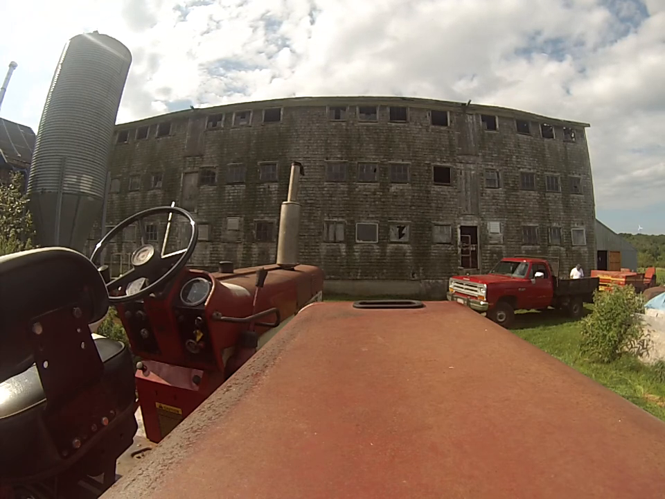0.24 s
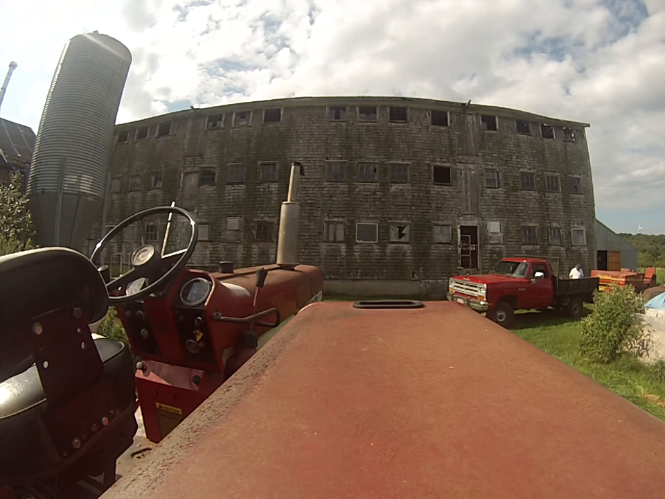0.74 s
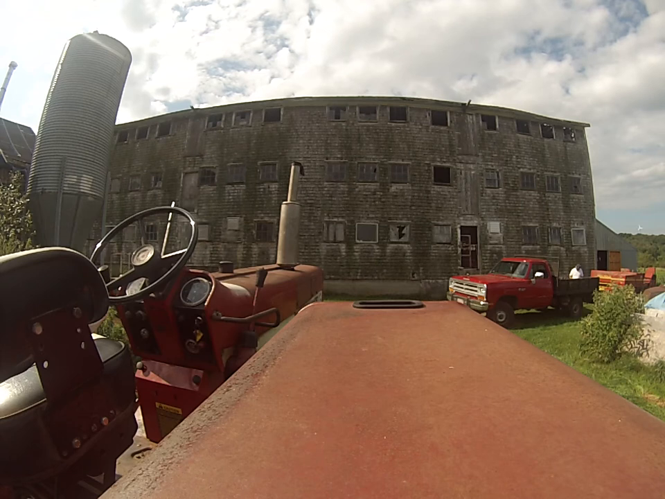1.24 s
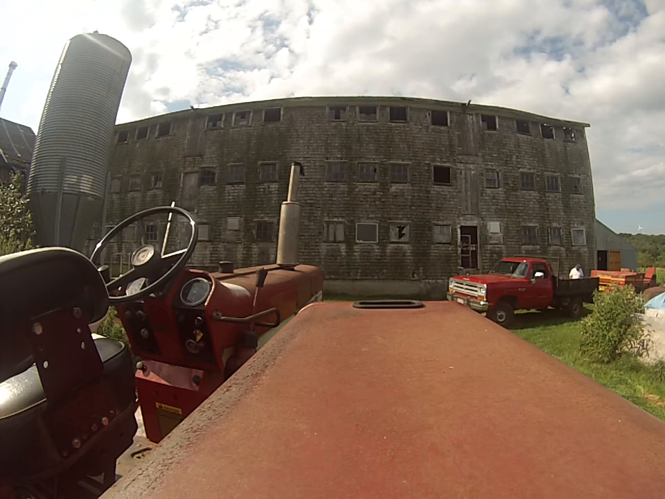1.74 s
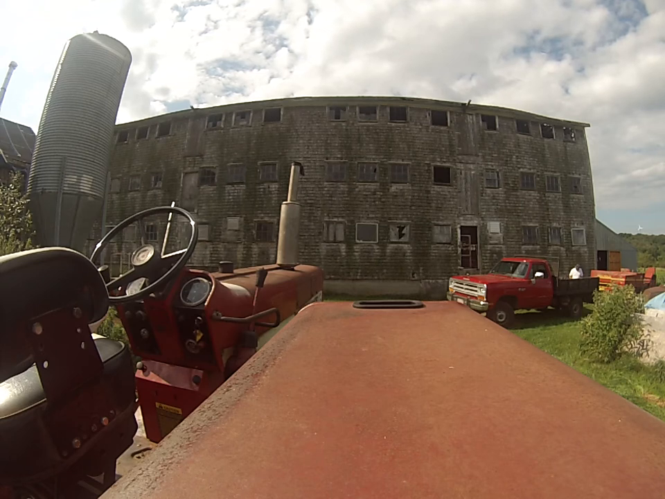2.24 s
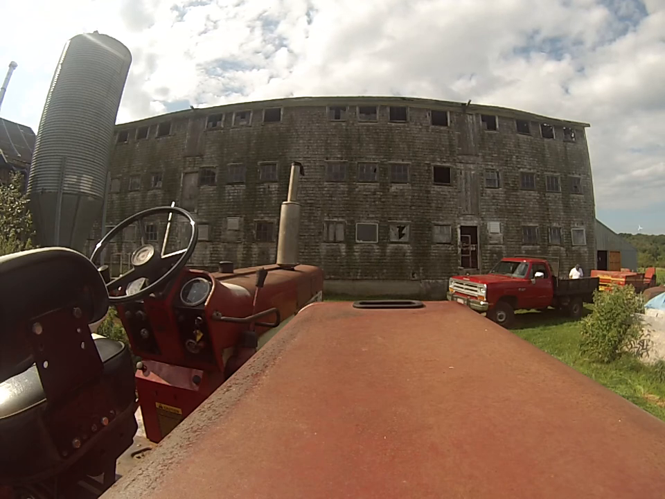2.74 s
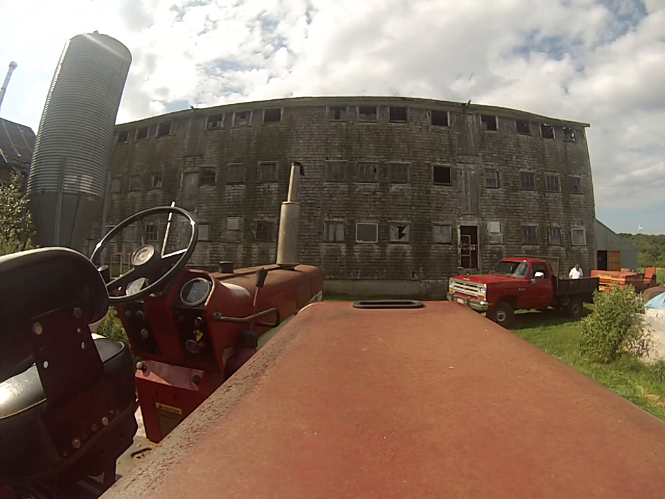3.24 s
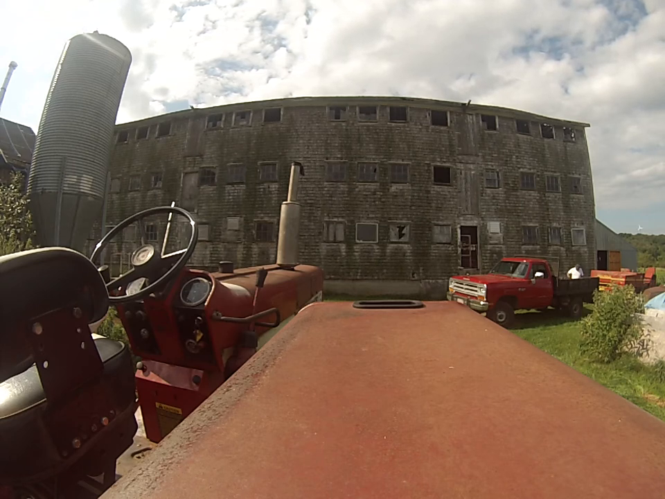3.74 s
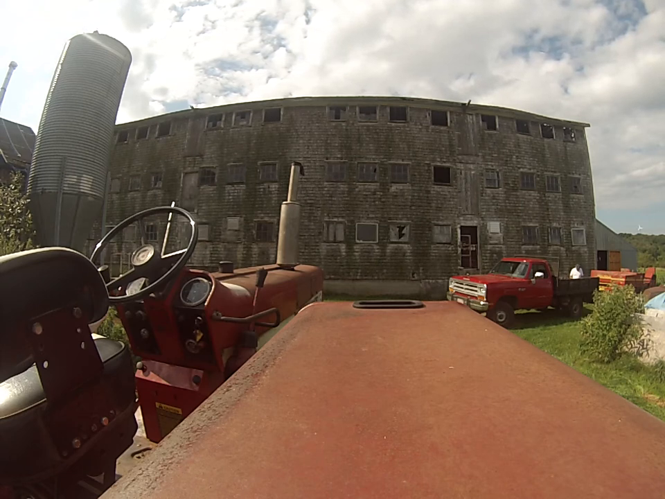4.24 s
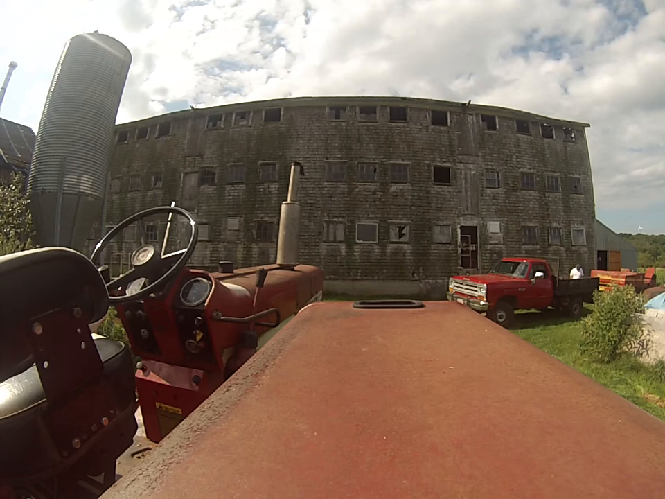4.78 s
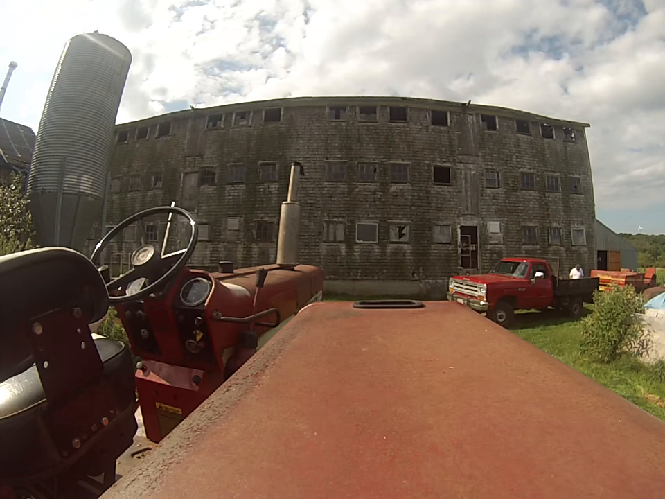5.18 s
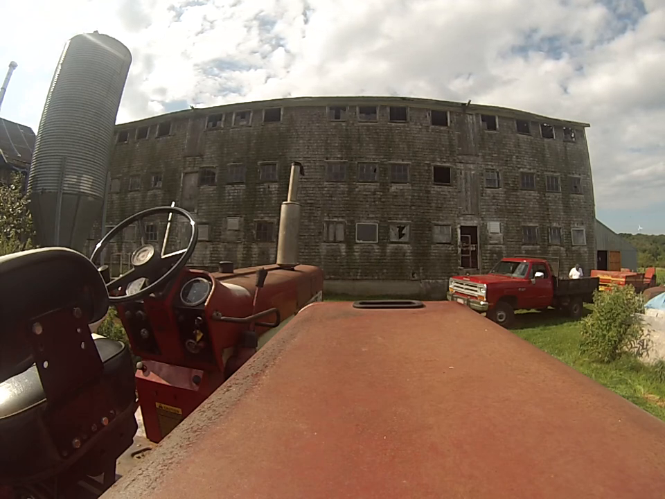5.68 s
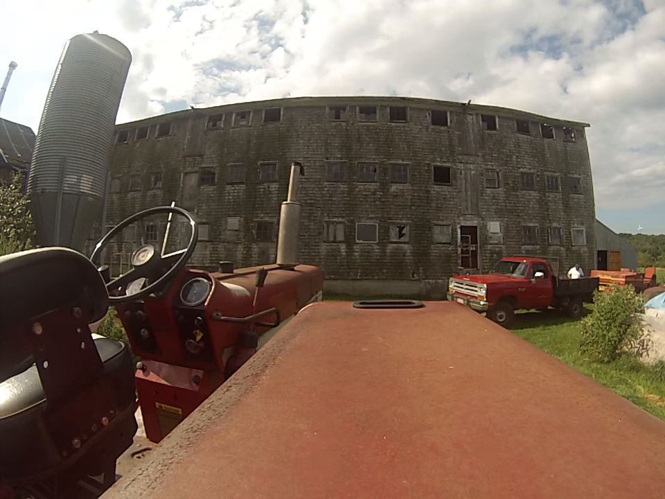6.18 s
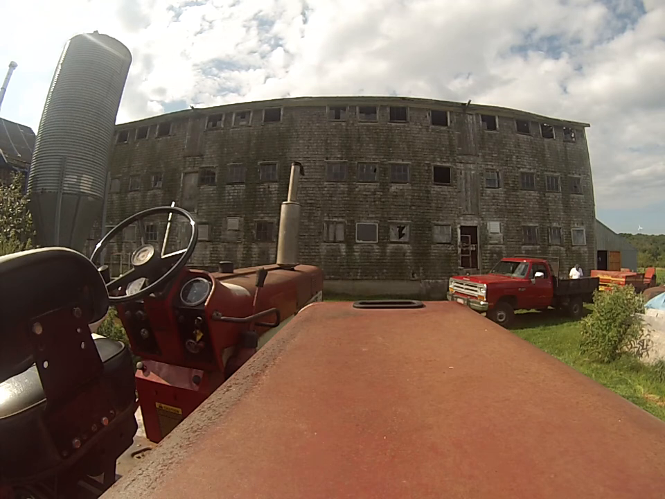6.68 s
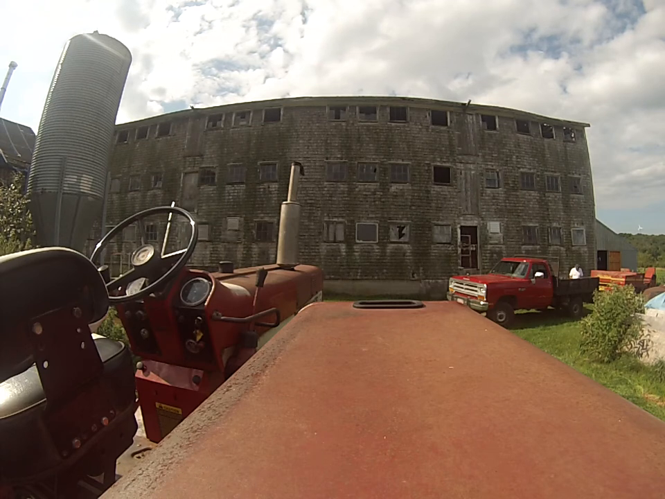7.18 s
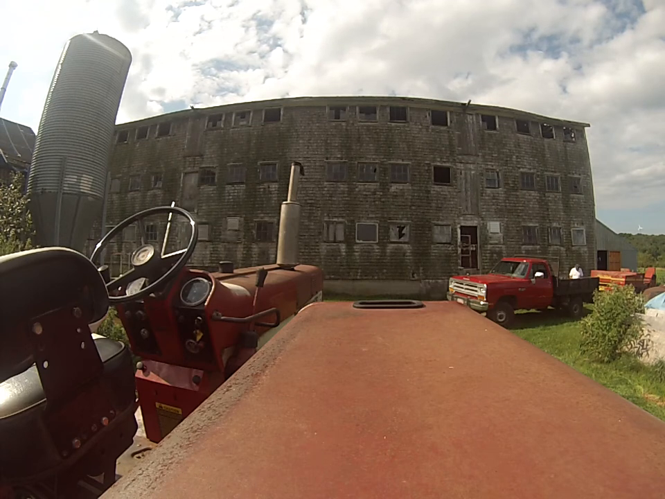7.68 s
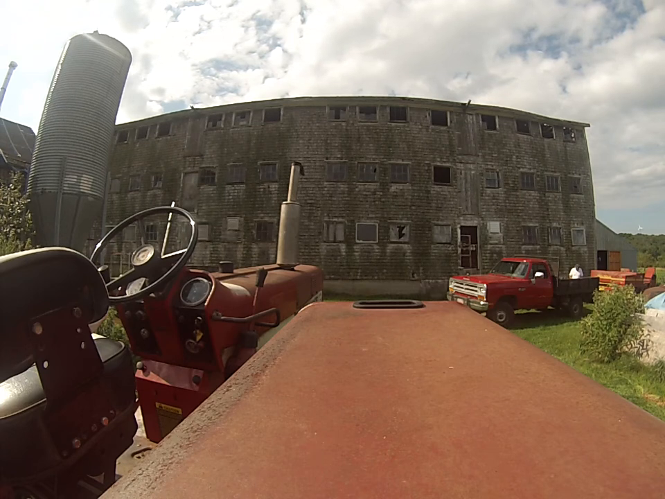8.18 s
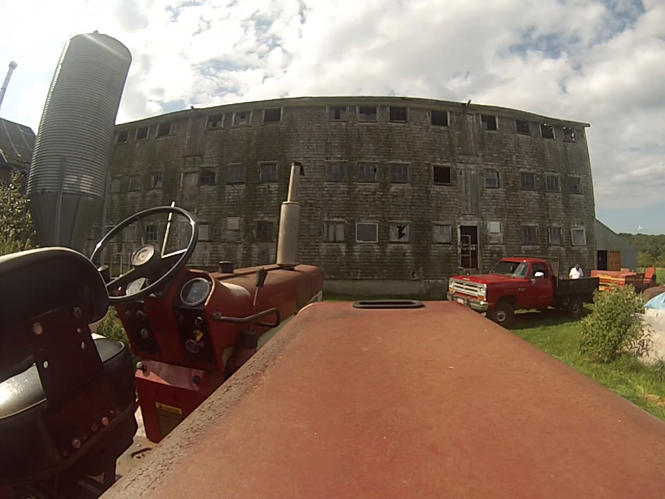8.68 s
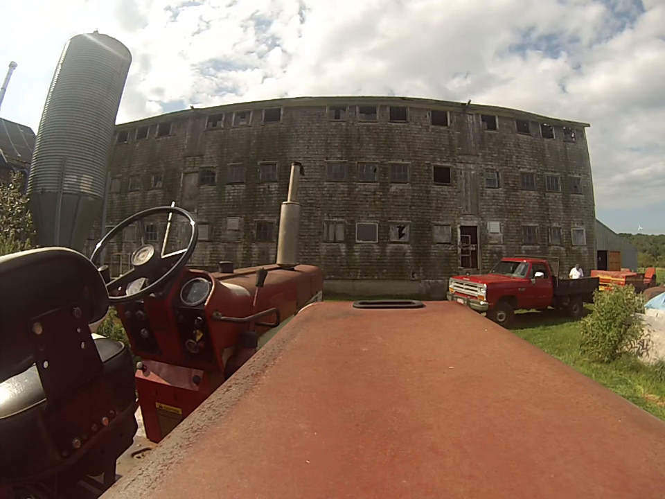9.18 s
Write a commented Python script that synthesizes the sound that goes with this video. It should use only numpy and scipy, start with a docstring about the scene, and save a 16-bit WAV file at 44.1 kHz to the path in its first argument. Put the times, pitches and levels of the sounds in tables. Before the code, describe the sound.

Low wind buffeting and soft thumps on a small outdoor microphone, over high continuous insect trilling, distant traffic, rustling leaves and sparse far bird calls.

```python
"""A summer farmyard, heard from a small camera resting on a parked tractor.
From the start a distant road rushes and leaves rustle as shaped noise; turbulence rumbles on the microphone.
Ground crickets trill and field crickets chirp lower down, as tones gated by wing strokes.
Far birds soon call in harmonics; from 1.3 s gusts bring thumps as pressure pulses.
Near 5 s a small bird chips in falling whistles."""
import sys
import numpy as np
from scipy import signal
from scipy.fft import rfft, irfft, next_fast_len
from scipy.io import wavfile
from scipy.ndimage import uniform_filter1d

SR = 44100
rng = np.random.default_rng(int(sys.argv[2]) if len(sys.argv) > 2 else 0)


def unload_wav(signal):
    """Save mono or channel-first audio to the path in sys.argv[1] as 16-bit WAV at rate SR, clipped to [-1, 1]."""
    wavfile.write(
        sys.argv[1],
        SR,
        np.round(np.clip(np.atleast_2d(signal).T, -1, 1) * 32767).astype(np.int16),
    )


N = 415422
TIME = np.arange(N) / SR  # seconds


def undb(db):
    """Decibels to an amplitude ratio: 20 dB is a factor of ten."""
    return 10 ** (np.asarray(db) / 20)


def level(x, db):
    """Normalisation: scale a signal to the given RMS level in dB."""
    return x * undb(db) / np.sqrt(np.mean(x ** 2))


def curve(table, at=TIME):
    """Linear interpolation of each column of a table against its first."""
    first, *columns = np.transpose(table)
    return [np.interp(at, first, column) for column in columns]


def drift(rate):
    """Slow random modulation: normal values, rate per second, joined by straight lines."""
    values = rng.standard_normal(int(N / SR * rate) + 2)
    return np.interp(TIME * rate, np.arange(len(values)), values)


def noise(spectrum):
    """Spectral shaping: Gaussian noise weighted by (Hz, dB per Hz) points, silent beyond both ends."""
    size = next_fast_len(N)
    f = np.arange(size // 2 + 1) * SR / size
    hz, db = np.transpose(spectrum)
    gain = undb(np.interp(np.log(f + 1), np.log(hz), db))
    gain *= (f > hz[0]) * (f < hz[-1])
    return irfft(rfft(rng.standard_normal(size)) * gain, size)[:N] * np.sqrt(SR / 2)


def steady(x):
    """Envelope normalisation: remove a noise's slow swells and leave its fast tumbling."""
    return x / np.sqrt(uniform_filter1d(x ** 2, size=SR // 8))


def tone(hz):
    """Phase accumulation: a sine on a moving pitch."""
    return np.sin(2 * np.pi * np.cumsum(hz) / SR)


def yard(x, t60, wet_db):
    """Exponential reverberation: direct sound plus scatter from barn, silo and trees, power kept."""
    t = TIME[:SR]
    tail = rng.standard_normal(SR) * np.exp(-np.log(1000) * t / t60)  # down 60 dB at t60 seconds
    tail *= undb(wet_db) / np.sqrt(np.sum(tail ** 2))
    scattered = signal.oaconvolve(x, tail)[:N]
    return (x + scattered) / np.sqrt(1 + undb(wet_db) ** 2)


# Spectrum of distant road and trees. Each row: frequency in Hz, density in dB per Hz.
ROAD_AIR = [(20, -81), (140, -81.5), (300, -86.5), (440, -89.5), (650, -89), (850, -86.5), (1000, -84),
            (1350, -94.5), (1750, -96), (2200, -101), (3000, -102), (5700, -105), (9300, -113.5),
            (12000, -117.5), (15000, -121)]
# Tyres on the distant road. Each row: time in seconds, level in dB.
TYRE_LEVEL = [(0, -78), (1.5, -72), (2.05, -59), (3.1, -66.5), (4.3, -62), (5.5, -64), (6.8, -64),
              (7.5, -63.5), (8.3, -80), (9.42, -76)]


def road():
    """Broadband noise with a modulated band: a steady rush; where tyres sing, it swells and flickers."""
    tyre_db, = curve(TYRE_LEVEL)
    tyres = level(noise([(740, -11.5), (860, -7), (980, -2), (1100, -5.5), (1300, -12.5)]), 0)
    rush = noise(ROAD_AIR) * undb(0.39 * drift(3.03))
    return rush + tyres * undb(tyre_db + 1.5 * drift(14))


# Leaves stirring in the breeze. Each row: time in seconds, level in dB.
LEAF_LEVEL = [(0, -75), (1.7, -70.5), (2.5, -67.5), (3.1, -69), (4.3, -70), (5.5, -74.5), (9.42, -73)]


def leaves():
    """Amplitude-modulated noise: a soft rustle that swells and flutters as it goes."""
    db, = curve(LEAF_LEVEL)
    rustle = noise([(1200, -18), (2400, -1), (3600, -1.5), (5000, -7), (9000, -17.5), (14000, -40)])
    return level(rustle, 0) * undb(db + 0.92 * drift(25))


# The breeze between gusts, with its lulls. Each row: time in seconds, wind level in dB.
BREEZE_LEVEL = [(0, -44.5), (2.1, -44.5), (2.8, -49.5), (3.5, -48), (4.5, -45), (5.35, -53), (5.85, -47),
                (6.95, -46.5), (7.25, -55), (7.75, -58.5), (8.25, -44), (9.42, -45.5)]
# Gusts riding on the breeze. Each row: time of the peak in seconds, length in seconds, wind level in dB.
GUST_PEAKS = [(1.28, 0.18, -37.5), (1.575, .25, -35.5), (2.55, .16, -42.5), (3.038, 0.15, -45),
              (3.876, .12, -34.5), (4.14, 0.27, -39.5), (4.906, 0.27, -41), (6.26, 0.084, -43),
              (6.518, 0.16, -36), (7.982, 0.24, -38.5), (8.41, 0.27, -39.5), (8.76, 0.38, -38),
              (9.03, 0.19, -36.5)]
GUST_RISE = 0.38  # share of a gust's length spent building up; it dies away in the rest


def wind_level():
    """Addition of powers, in dB: the breeze plus gusts, each a bell that builds faster than it dies."""
    breeze_db, = curve(BREEZE_LEVEL)
    power = undb(breeze_db) ** 2
    for peak, length, db in GUST_PEAKS:
        width = length * np.where(TIME < peak, GUST_RISE, 1 - GUST_RISE)
        power = power + undb(db) ** 2 * np.exp(-((TIME - peak) / width) ** 2)
    return 10 * np.log10(power)


# Spectral shape of the large eddies. Each row: frequency in Hz, relative density in dB per Hz.
EDDY_SPECTRUM = [(10, -7.5), (25, 3.5), (45, 1), (75, -3), (105, -10), (140, -27), (250, -33.5), (600, -54)]
RUMBLE_DB = 0.48  # large eddies, relative to the wind's level
FLUTTER_DB, FRESH_WIND_DB = -53, -41.5  # small eddies' gain in a fresh wind, and that wind's level
FLUTTER_GROWTH = 1.28  # dB the small eddies gain per dB of wind


def wind():
    """Turbulence on the microphone port: large eddies rumble; small ones flutter and fade faster in lulls."""
    wind_db = wind_level()
    large = steady(noise(EDDY_SPECTRUM))
    small = steady(noise([(70, -12), (120, 5), (165, -2), (240, -10), (350, -22.5), (700, -33), (1500, -64)]))
    rumble = large * undb(wind_db + RUMBLE_DB + 1.25 * drift(9))
    flutter_db = FLUTTER_DB + FLUTTER_GROWTH * (wind_db - FRESH_WIND_DB)
    return rumble + small * undb(flutter_db + 2.4 * drift(30))


# One wing stroke; the scraper slows at its end.
# Each row: share of the cycle from 0 to 1, pitch as a ratio, relative level in dB.
WING_STROKE = [(0, 1, -61), (.22, 1, -33), (.35, 0.98, 4.5), (.5, 1, 6), (.59, 0.94, 7), (.68, .94, -4.5),
               (.78, .91, -20), (1, .9, -45)]


def trill(strokes_hz, start, pitch_hz, scrape, wander):
    """Stridulation: each stroke draws scraper over file, an arched tone shaken by uneven teeth."""
    cycle = (np.cumsum(strokes_hz) / SR + start) % 1
    ratio, db = curve(WING_STROKE, cycle)
    shake = 1 + scrape * drift(900) + wander * drift(25)
    return level(undb(db) * tone(pitch_hz * ratio * shake), 0)


# Pace of the two closest ground crickets.
# Each row: time in seconds, first cricket's and second cricket's wing strokes in Hz.
WING_PACE = [(0, 18.77, 18.22), (1.3, 18.64, 18.07), (2.7, 18.48, 18.08), (4, 18.81, 18.12),
             (5.4, 18.68, 18.4), (6.7, 18.51, 18.25), (8.1, 18.54, 18.01), (9.4, 18.77, 18.59)]
# The far ground crickets merge into a hiss. Each row: frequency in Hz, density in dB per Hz.
MEADOW_HISS = [(5300, -122), (6200, -103), (7000, -99), (7750, -94), (8300, -96), (8600, -105),
               (8900, -122)]


def ground_crickets():
    """Superposed stridulation: two close trills, a further crowd each at its own pace, and a hiss."""
    first_hz, second_hz = curve(WING_PACE)
    first = trill(first_hz, start=0.0812, pitch_hz=8060, scrape=0.00781, wander=0.0046)
    second = trill(second_hz, start=0.52, pitch_hz=8654, scrape=0.003, wander=0.00141)
    close = undb(-64.5 + 1.2 * drift(11)) * first + undb(-72 + drift(8)) * second
    crowd = 0
    for pitch_hz in np.linspace(6500, 8400, num=18):
        db = -abs(pitch_hz - 7800) / 200  # loudest near 7800 Hz
        pace_hz = rng.uniform(13.5, 19) + 0.25 * drift(1)
        moving_hz = pitch_hz * (1 + 0.008 * drift(0.98))
        crowd = crowd + undb(db) * trill(pace_hz, rng.random(), moving_hz, scrape=0.008, wander=0.008)
    crowd = level(yard(crowd, t60=0.25, wet_db=-18), -64)
    return yard(close, t60=0.25, wet_db=-13) + crowd + noise(MEADOW_HISS)


# Closest field cricket. Each row: time of the first stroke's peak in seconds,
# first stroke's level in dB, second stroke's level in dB.
CHIRP_PAIRS = [(.041, -57.5, -58), (.945, -59, -55), (2.133, -55, -59), (4.064, -60, -57),
               (6.069, -56, -56.5), (7.975, -59, -57), (9.167, -56, -56.5)]
STROKE_GAP_S, STROKE_WIDTH_S = 0.05, 0.0069  # every chirp is two wing strokes


def near_field_cricket():
    """Pulsed stridulation: each chirp is a pair of bell-shaped bursts of an unsteady tone."""
    strokes = np.zeros(N)
    for start, first_db, second_db in CHIRP_PAIRS:
        for peak, db in [(start, first_db), (start + STROKE_GAP_S, second_db)]:
            strokes += undb(db) * np.exp(-((TIME - peak) / STROKE_WIDTH_S) ** 2)
    chirps = np.sqrt(2) * strokes * tone(5150 * (1 + 0.0099 * drift(600)))
    return yard(chirps, t60=0.2, wet_db=-16)


def far_field_crickets():
    """Superposed, slowly pulsed trills: seven chirp without rest over the hiss of the furthest."""
    far = 0
    for pitch_hz in np.linspace(4950, 5400, num=7):
        chirps_hz = rng.uniform(2, 3.5) + 0.5 * drift(2)
        chirping = np.sin(np.pi * np.cumsum(chirps_hz) / SR) ** 2
        db = -abs(pitch_hz - 5210) / 45
        pace_hz = rng.uniform(18, 25) + 1.5 * drift(5)
        song = trill(pace_hz, rng.random(), pitch_hz, scrape=0.01183, wander=0.01)
        far = far + undb(db) * chirping * song
    furthest = noise([(4500, -116), (4900, -103), (5170, -97), (5400, -103), (5800, -116)])
    return level(yard(far, t60=0.25, wet_db=5), -73) + furthest


# A thin insect buzz. Each row: time in seconds, pitch in Hz, level in dB.
BUZZ_PATH = [(0, 5180, -77.5), (6.7, 5200, -74), (7.3, 5210, -71.5), (8.2, 5310, -68), (8.4, 5180, -74),
             (9.42, 5130, -79.5)]


def buzzing_cricket():
    """Amplitude modulation: an unsteady tone fully modulated at 66 Hz makes a thin buzz."""
    buzz_hz, buzz_db = curve(BUZZ_PATH)
    buzz = (1 + np.cos(2 * np.pi * 66 * TIME)) * tone(buzz_hz * (1 + 0.01388 * drift(400)))
    return level(buzz, 0) * undb(buzz_db)


# Far bird calls. Each row: start in seconds, length in seconds, strongest partial in Hz,
# level in dB before the yard's scatter, roughness from 0 to 1.
FAR_CALLS = [(.23, 0.14, 987, -54, 0.1), (.475, 0.042, 1006, -56, 0.37), (.63, 0.067, 1015, -55, 0.3),
             (.72, 0.047, 1071, -61, .15), (.785, 0.091, 1090, -58, 0.16), (3.71, .11, 1102, -58, 0.3),
             (5.07, 0.2, 995, -53.5, 0.25), (5.12, 0.19, 1110, -60, 0.62), (5.58, .075, 988, -54, .2),
             (6.14, 0.23, 1077, -61, 0.4), (8.66, .17, 1077, -58, .3)]
# Faint low hoots, far off. Each row: start in seconds, length in seconds, strongest partial in Hz,
# level in dB before the yard's scatter, roughness from 0 to 1.
FAR_HOOTS = [(1.05, 0.063, 405, -59, 0.1), (5.66, 0.22, 295, -59.5, 0.53), (6.66, 0.293, 276, -59, 0.54)]


def calls(table, side_db):
    """Harmonic voice: the throat favours the third harmonic; its neighbours barely carry this far."""
    out = np.zeros(N)
    rasp = drift(260) + 1j * drift(260)
    throb = undb(3.6 * drift(35))  # the voice catches and swells
    waver = 1 + 0.01 * drift(22)  # and its pitch is unsteady
    for start, length, hz, db, rough in table:
        span = (TIME > start) & (TIME < start + length)
        arch = np.abs(np.sin(np.pi * (TIME[span] - start) / length)) ** 0.26
        throat = np.exp(2j * np.pi * np.cumsum(hz / 3 * waver[span]) / SR)
        voice = throat ** 3 + undb(side_db) * (throat ** 4 + 0.5 * throat ** 2)
        # a rough throat smears each harmonic into a narrow band
        hoarse = np.imag(voice * (1 - rough + rough * rasp[span]))
        out[span] += level(hoarse * arch * throb[span], db)
    return out


# The hardest eddies. Each row: time in seconds, peak pressure as a share of full scale,
# half width in seconds.
THUMPS = [(1.281, 0.02, 0.00099), (1.556, 0.053, 0.0037), (1.611, .08, 0.0023), (3.065, 0.03, 0.0052),
          (3.893, 0.047, 0.0039), (6.53, .045, 0.0024), (8.811, 0.043, .0012), (9.026, 0.034, .0011),
          (9.16, 0.043, 0.0017)]


def thumps():
    """Pressure pulses: each hard eddy thumps the microphone, a push between two weaker pulls."""
    out = np.zeros(N)
    for peak, pressure, width in THUMPS:
        u = (TIME - peak) / width
        out += pressure * (1 - u ** 2 / 2) * np.exp(-u ** 2 / 2)
    return out


# A small bird's falling chips. Each row: start in seconds, length in seconds, starting pitch in Hz,
# pitch the fall tends to in Hz, level in dB before the yard's scatter.
FALLING_CHIPS = [(4.922, .055, 4860, 3310, -71), (5.055, .042, 5450, 3400, -70)]


def chips():
    """Exponential glide: short whistles that drop fast and then begin to level off."""
    out = np.zeros(N)
    for start, length, start_hz, end_hz, db in FALLING_CHIPS:
        span = (TIME > start) & (TIME < start + length)
        u = (TIME[span] - start) / length
        whistle = tone(end_hz + (start_hz - end_hz) * np.exp(-2.2 * u))
        out[span] += level(np.sin(np.pi * u) ** 0.5 * whistle, db)
    return out


def birds():
    """Multipath scattering: far calls, hoots and chips, blurred by their way across the fields."""
    voices = calls(FAR_CALLS, side_db=-18) + calls(FAR_HOOTS, side_db=-28) + chips()
    return yard(voices, t60=0.66, wet_db=-6.5)


def scene():
    """Superposition: all sources reach both channels alike; only a faint hiss differs."""
    field_crickets = near_field_cricket() + far_field_crickets() + buzzing_cricket()
    mid = road() + leaves() + wind() + ground_crickets() + field_crickets + birds() + thumps()
    side = noise([(200, -120), (1000, -120), (2000, -114), (3000, -114), (5000, -121), (8000, -126),
                  (12000, -132)])
    return np.array([mid + side, mid - side])


def record(dry):
    """Band limiting: the camera cuts the top with a steep low-pass at 15150 Hz."""
    low_pass = signal.ellip(8, 0.2, 70, 15150, fs=SR, output="sos")
    return signal.sosfilt(low_pass, dry)


dry = scene()
out = record(dry)
unload_wav(out)
```